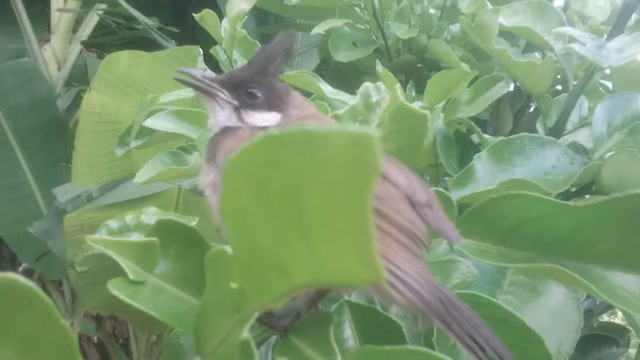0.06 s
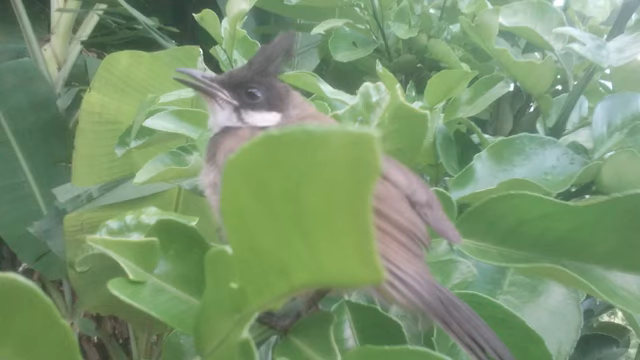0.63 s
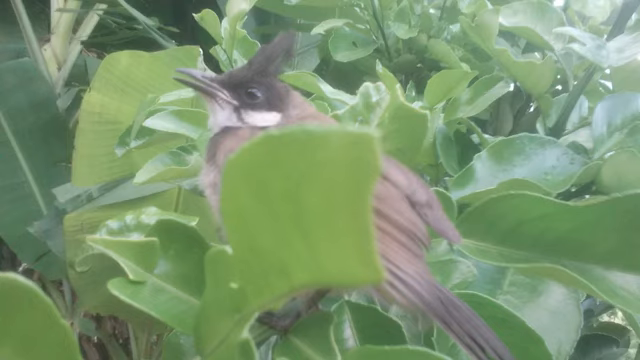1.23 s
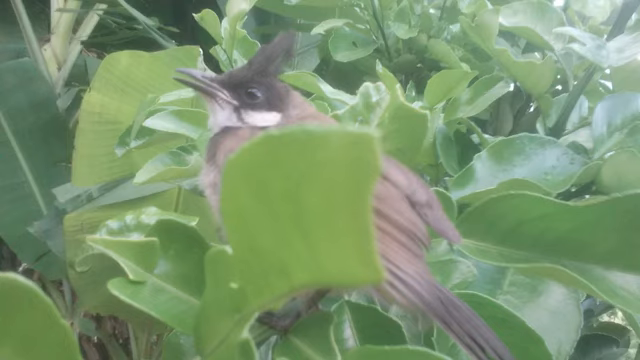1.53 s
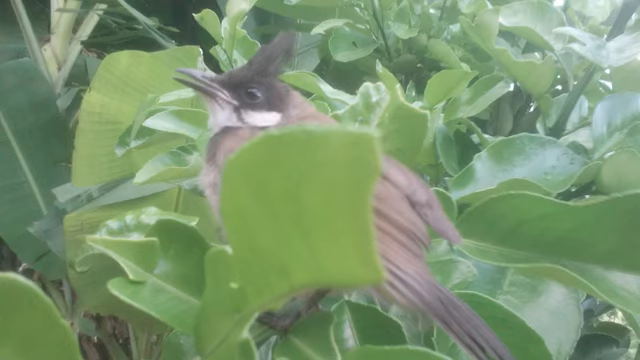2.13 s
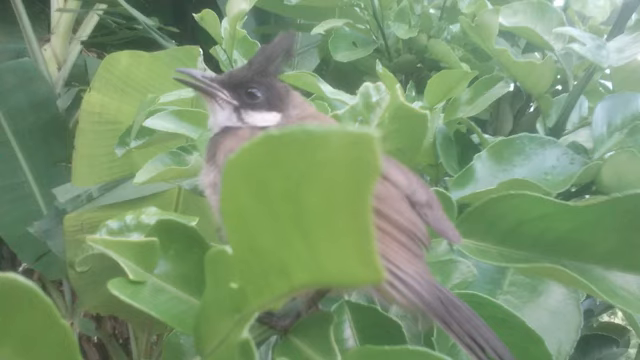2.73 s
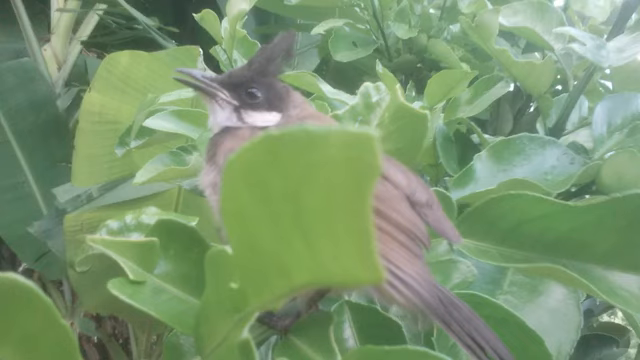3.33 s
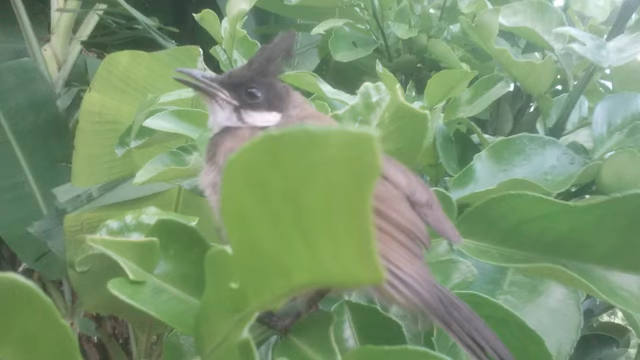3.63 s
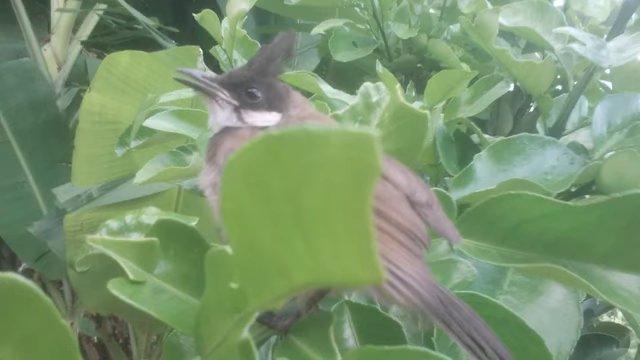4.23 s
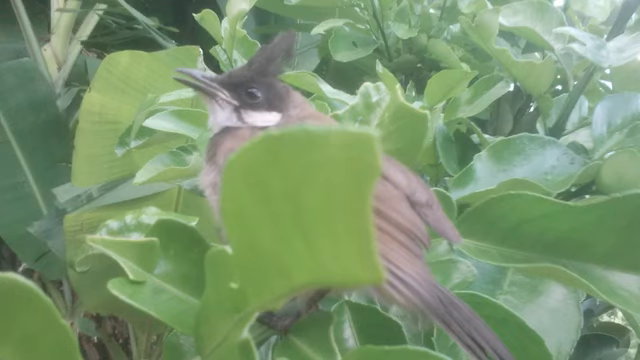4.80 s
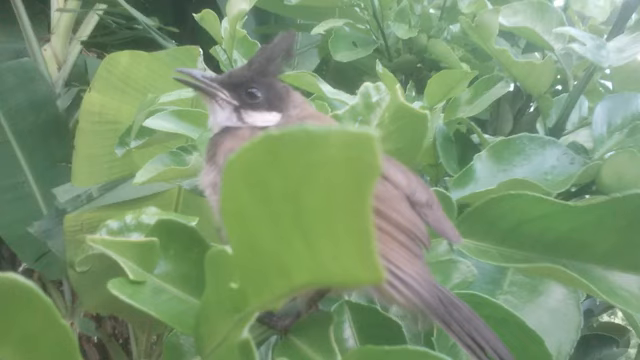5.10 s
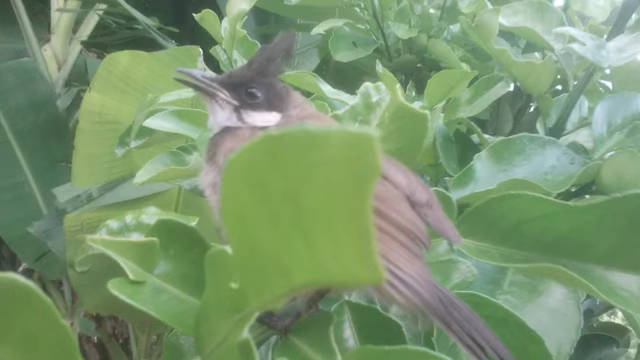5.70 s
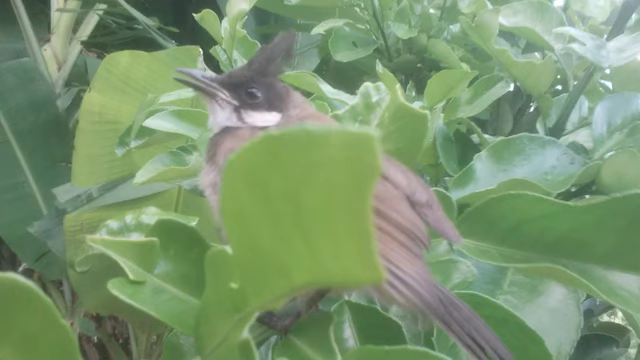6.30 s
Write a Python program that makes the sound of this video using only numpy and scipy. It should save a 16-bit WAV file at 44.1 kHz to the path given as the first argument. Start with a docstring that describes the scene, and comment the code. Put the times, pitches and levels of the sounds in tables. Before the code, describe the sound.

Sharp, slightly raspy bird chirps come singly and in pairs outdoors, while gusts of wind softly buffet the microphone.

```python
"""A bulbul gives fifteen sharp, rising chirps, singly and in pairs, from a bush near the microphone.
Each starts hoarse, climbs through a fast trill and leaps to a crest; windpipe and beak shape the
syrinx's harmonics and the leaves scatter them. Wind buffets the microphone unevenly. Far traffic
murmurs behind, with a few faint horns and an insect; there is one soft knock."""
import sys
import numpy as np
from scipy import signal
from scipy.fft import rfft, irfft, next_fast_len
from scipy.io import wavfile
from scipy.ndimage import uniform_filter1d, map_coordinates

SR = 44100
rng = np.random.default_rng(int(sys.argv[2]) if len(sys.argv) > 2 else 0)


def wav_record(signal):
    """Record a signal, one row per channel, as 16-bit PCM in the file named by sys.argv[1]."""
    frames = np.transpose(np.atleast_2d(signal))
    bounded = np.clip(frames, -1, 1)
    # unit amplitude maps onto the largest positive 16-bit level
    quanta = np.round(bounded * 32767).astype(np.int16)
    wavfile.write(sys.argv[1], SR, quanta)


N = 288855
TIME = np.arange(N) / SR
TOP_HZ = 15750


def undb(db):
    """Decibels to gain."""
    return 10 ** (np.asarray(db) / 20)


def curve(rows):
    """Linear envelope through (time_s, value) rows."""
    return np.interp(TIME, *np.transpose(rows))


def at_pitch(hz, points):
    """Interpolate (freq_hz, value) points on a log-frequency axis."""
    freq_hz, value = np.transpose(points)
    return np.interp(np.log(np.maximum(hz, 1)), np.log(freq_hz), value)


def colour(x, points):
    """Filter by (freq_hz, gain_db) points."""
    size = next_fast_len(len(x))
    gain = undb(at_pitch(np.fft.rfftfreq(size, 1 / SR), points))
    return irfft(rfft(x, size) * gain, size)[:len(x)]


def noise(points):
    """Unit-rms noise shaped by (freq_hz, gain_db) points."""
    x = colour(rng.standard_normal(N), points)
    return x / np.sqrt(np.mean(x ** 2))


def butter(order, hz, kind):
    """Butterworth sections."""
    return signal.butter(order, hz, kind, fs=SR, output="sos")


def wander(count, rate_hz):
    """Smooth random signal, spread near 1."""
    place = np.arange(count) * rate_hz / SR
    return map_coordinates(rng.standard_normal(count // 4), [place], order=3, mode="wrap")


def add(track, start_s, sound):
    """Mix a sound into a track."""
    i = max(int(start_s * SR), 0)
    track[i:i + len(sound)] += sound[:N - i]


# Road loudness: time_s, level_db
ROAD_LEVEL = [(0, -74.5), (2.4, -73), (4.4, -70), (5.4, -69), (6.55, -73)]
# Road spectrum: freq_hz, gain_db
ROAD_SPECTRUM = [(200, -10.5), (370, -8), (450, -4), (800, 1), (1200, -1.5), (1800, -6.5), (2500, -14.5),
                 (3500, -31), (6000, -36.5)]


def traffic():
    """Far road: a dull murmur in two bands that swell independently."""
    murmur = noise(ROAD_SPECTRUM)
    low = signal.sosfiltfilt(butter(2, 950, "low"), murmur)
    road = sum(band * undb(2.7 * wander(N, 24)) for band in (low, murmur - low))
    return road * undb(curve(ROAD_LEVEL))


# Horn blasts: start_s, length_s, pitch_hz, harmonic1_db, harmonic2_db, harmonic3_db
HORN_BLASTS = [(.48, .12, 512, -88, -72, -88), (.68, .16, 503, -87, -65, -66),
               (1.48, .45, 441, -75, -93, -93), (2.52, .56, 482, -78, -84, -90),
               (3.48, .55, 443, -78, -94, -94), (4.1, .5, 441, -81, -94, -94)]


def horns():
    """Far horns: three harmonics, wavering in pitch and level."""
    track = np.zeros(N)
    t = TIME[:SR]
    for start_s, length_s, pitch_hz, *levels_db in HORN_BLASTS:
        phase = 2 * np.pi * np.cumsum(pitch_hz * (1 + .009 * wander(SR, 70))) / SR
        swell = np.clip(np.minimum(t, length_s - t) / .011, 0, 1) * undb(1.9 * wander(SR, 31))
        tone = sum(np.sqrt(2) * undb(db) * np.sin(k * phase) for k, db in enumerate(levels_db, 1))
        add(track, start_s, swell * tone)
    return track


# Insect buzzes: start_s, length_s, level_db
INSECT_BUZZES = [(.24, .2, -82), (3.55, .7, -89)]


def insect():
    """Far insect: faint, flickering narrow-band noise."""
    buzz = noise([(3600, -40), (4350, -14), (4520, 0), (4700, -14), (5500, -40)])
    swell = sum(undb(db) * np.clip(np.minimum(TIME - start_s, start_s + length_s - TIME) / .09, 0, 1)
                for start_s, length_s, db in INSECT_BUZZES)
    return buzz * swell * undb(2 * wander(N, 30))


def knock(start_s=5.215, decay_s=.022):
    """One soft, dull knock, as of a finger shifting on the housing."""
    since_s = np.maximum(TIME - start_s, 0)
    body = noise([(100, 5.5), (300, -5), (800, -4.5), (2500, -18.5), (5000, -48.5)])
    return undb(-49.5) * body * (since_s > 0) * np.exp(-since_s / decay_s)


# Hardest eddies: start_s, strength_db
BUFFET_HITS = [(0.409, -33.5), (0.935, -36.5), (0.992, -31.5), (1.158, -36.5), (1.283, -28), (1.682, -41.5),
               (1.891, -37.5), (2.698, -34.5), (3.238, -32.5), (4.044, -36), (4.11, -31), (4.147, -42),
               (4.19, -31), (4.405, -30), (4.449, -36), (4.693, -34.5), (4.741, -27.5), (4.921, -34.5),
               (5.034, -37.5), (5.683, -43)]


def buffets(delay_s=.0095, width_s=.0018, wake_rise_s=.005, wake_decay_s=.014):
    """Eddies strike the microphone: returns their thuds and the envelope of the swirls they leave."""
    thuds, wakes = np.zeros(N), np.zeros(N)
    t = TIME[:SR // 10]
    push = (t - delay_s) / width_s
    pulse = (push ** 2 - 1) * np.exp(-push ** 2 / 2)
    wake = np.minimum(t / wake_rise_s, 1) * np.exp(-t / wake_decay_s)
    for start_s, strength_db in BUFFET_HITS:
        add(thuds, start_s, undb(strength_db - 3.5) * pulse)
        add(wakes, start_s, undb(strength_db - 7) * wake)
    return thuds, wakes


# Breeze between gusts: time_s, level_db
BREEZE_LEVEL = [(0, -63.5), (1.8, -65), (2.1, -85), (2.3, -63), (3.7, -66.5), (5.1, -59), (5.45, -78.5),
                (6.55, -84)]
# Gusts: start_s, length_s, strength_db
WIND_GUSTS = [(0.208, 0.35, -44.5), (0.73, 0.076, -53.5), (0.899, 0.17, -47.5), (1.138, 0.26, -43.5),
              (1.47, 0.038, -51.5), (1.638, 0.1, -45), (1.873, 0.017, -45), (2.261, 0.086, -65),
              (2.569, 0.36, -46), (2.991, 0.14, -48.5), (3.156, 0.19, -39.5), (3.421, 0.25, -48.5),
              (4.022, 1.08, -43), (5.207, 0.087, -49.5), (5.636, 0.1, -49.5)]


def airflow(rise_s=.021, fall_s=.025, gust_trim_db=-5.5):
    """Wind envelope: gusts rise, hold and die away over a light breeze."""
    flow = undb(curve(BREEZE_LEVEL))
    for start_s, length_s, strength_db in WIND_GUSTS:
        since_s = TIME - start_s
        release = np.exp(-np.maximum(since_s - length_s + fall_s, 0) / fall_s)
        flow += undb(strength_db + gust_trim_db) * np.clip(since_s / rise_s, 0, 1) * release
    return flow


# Eddy spectrum: freq_hz, gain_db
EDDY_SPECTRUM = [(18, -52.5), (30, -10.5), (40, -2), (52, 4), (70, 3.5), (95, -2), (130, -7.5), (170, -12),
                 (230, -31), (300, -23), (370, -47.5), (440, -33.5), (600, -53), (1000, -91.5)]


def wind(swirl_db=4, swirl_hz=50):
    """Eddies rumble on the microphone port, brighter in strong gusts; the hardest thud."""
    eddies = noise(EDDY_SPECTRUM)
    eddies /= np.sqrt(uniform_filter1d(eddies ** 2, size=1800))
    small_eddies = signal.sosfilt(butter(2, 170, "high"), noise(EDDY_SPECTRUM))
    thuds, wakes = buffets()
    flow_db = 20 * np.log10(airflow() + wakes)
    brightness = np.clip((flow_db + 55) / 14, 0, .9)
    rumble = (eddies + brightness * small_eddies) * undb(flow_db + swirl_db * wander(N, swirl_hz))
    return signal.sosfiltfilt(butter(4, 36, "high"), rumble + thuds)


def scatter(song):
    """Echoes: quick scatter off the nearest leaves, a faint tail from the garden."""
    t = TIME[:SR // 2]
    response = 0
    for t60_s, echo_db in [(.02, -18), (.4, -38)]:
        tail = rng.standard_normal(len(t)) * undb(-60 * t / t60_s) * (t > .001)
        response = response + undb(echo_db) * tail / np.linalg.norm(tail)
    return signal.fftconvolve(song, response)[:N]


# Crest contour, leap to end: time_fraction, pitch_ratio
CREST_ARCH = [(0, .9), (.2, .97), (.4, 1), (.6, .98), (.8, .87), (1, .76)]


def syrinx_pitch(t, leap_s, length_s, open_hz, climb_hz, crest_hz, trill):
    """A scoop, a quickening trilled climb, then a leap to an arched crest that cracks once and falls."""
    scoop = 1 - .13 * np.exp(-((t - .009) / .0044) ** 2)
    rising_hz = open_hz * scoop + (climb_hz - open_hz) * np.clip(t / leap_s, 0, 1) ** 2
    crest_fraction = np.clip((t - leap_s) / (length_s - leap_s), 0, 1)
    arch_hz = crest_hz * np.interp(crest_fraction, *np.transpose(CREST_ARCH))
    crack = 1 - .2 * np.exp(-((crest_fraction - .6) / .07) ** 2)
    leapt = np.clip((t - leap_s) / .002, 0, 1)
    return (1 - leapt) * rising_hz * (1 + trill) + leapt * arch_hz * crack


# Harmonics, throat tuned to the second: number, gain_db
THROAT_HARMONICS = [(1, -12), (2, -2), (3, -20), (4, -19), (5, -31.5), (6, -24), (7, -33), (8, -27.5),
                    (9, -39), (10, -36.5), (11, -50), (12, -38)]
# Windpipe and beak response: freq_hz, gain_db
TRACT_RESPONSE = [(600, -30), (1000, -13.5), (1400, -9), (1900, 3), (3000, 3), (4100, -2), (4800, -8),
                  (6200, 0), (7500, -8.5), (10000, -8), (12500, -19.5), (15500, -13)]
# Treble let out by the open beak: freq_hz, gape_share
BEAK_TREBLE = [(2200, 0.007), (4500, 0.51), (6300, 1), (9000, 0.5), (12000, 0.19)]


def vocal_tract(pitch_hz, gape_db, odd_db):
    """Harmonic voice and breath hiss, each shaped by the windpipe and the opening beak."""
    phase = 2 * np.pi * np.cumsum(pitch_hz) / SR
    voice = 0
    for k, harmonic_db in THROAT_HARMONICS:
        hz = k * pitch_hz
        tract_db = at_pitch(hz, TRACT_RESPONSE) + gape_db * at_pitch(hz, BEAK_TREBLE)
        gain = undb(harmonic_db + k % 2 * odd_db + tract_db) * (hz < TOP_HZ)
        voice = voice + np.sqrt(2) * gain * np.sin(k * phase)
    breath = colour(rng.standard_normal(len(pitch_hz)), TRACT_RESPONSE)
    treble = signal.sosfiltfilt(butter(2, [5200, 9500], "band"), breath)
    return voice, breath + treble * (undb(gape_db) - 1)


def chirp(leap_s, length_s, open_hz, climb_hz, crest_hz, trill_depth, trill_hz,
          base_db, crest_db, climb_gape_db, crest_gape_db):
    """One call: the syrinx membranes trill, rasp and flutter as the beak opens and shuts."""
    count = SR // 6
    t = TIME[:count]
    depth = trill_depth * np.clip((t / leap_s - .25) / .6, 0, 1) ** 1.3
    trill_phase = 2 * np.pi * trill_hz * (t - leap_s) + wander(count, 90)
    trill = depth * np.sin(trill_phase)
    throb = undb(11 * depth * np.sin(trill_phase + .8))
    pitch_hz = syrinx_pitch(t, leap_s, length_s, open_hz, climb_hz, crest_hz, trill)

    # A higher crest and a wider beak add rasp.
    rasp = undb(2.44 + .0199 * (crest_hz - 2120) + .17 * climb_gape_db)
    hoarse = rasp * np.interp(t, [.4 * leap_s, .85 * leap_s], [.45 * rasp, 1.2])
    # The membranes flutter at onset and burr when a high crest strains them.
    onset = np.interp(t, [.010, .018], [1, 0])
    strain = np.clip((crest_hz - 1650) / 400, 0, 1) * np.interp(t, [leap_s, leap_s + .012], [0, 1])
    jitter = .019 * hoarse * wander(count, 1200) + .042 * strain * wander(count, 450)
    jitter += .11 * onset * wander(count, 700)

    gape_db = np.interp(t, [0, .019, .5 * leap_s, leap_s + .02, length_s - .016, length_s],
                        [climb_gape_db - 16.5, climb_gape_db, climb_gape_db,
                         crest_gape_db, crest_gape_db, crest_gape_db - 16.5])
    odd_db = -3.5 * np.clip(2 - 2 * t / leap_s, 0, 1)  # odd harmonics break out at the crest
    voice, breath = vocal_tract(pitch_hz * (1 + jitter), gape_db, odd_db)
    voice *= 1 + .13 * hoarse * wander(count, 1300) + .42 * (strain + onset) * wander(count, 550)
    breath *= undb(-24) * rasp * np.interp(t, [.002, .02, leap_s], [0, .65, 1])

    effort_db = np.interp(t, [0, .008, .02, .5 * leap_s, leap_s,
                              length_s - .018, length_s - .008, length_s],
                          [-15, -11, -1, 0, crest_db / 2 - .5,
                           crest_db - 1, crest_db - 13.5, crest_db - 27])
    gate = np.sin(np.pi / 2 * np.clip(np.minimum(t, length_s - t) / .004, 0, 1)) ** 2
    return (voice + breath) * throb * gate * undb(base_db + effort_db)


# Calls: start_s, leap_s (after start), length_s, open_hz, climb_hz (before the leap), crest_hz,
# trill_depth_ratio, trill_hz, base_db, crest_db (relative to base), climb_gape_db, crest_gape_db
BULBUL_CALLS = [ (.158, 0.082, .110, 915, 1570, 1948, 0.13, 139.3, -34, -1, 8, 12.5),
                (0.657, 0.071, 0.11, 931, 1394, 2017, 0.11, 152, -31.5, 5.5, 4, -3.5),
                (0.801, 0.064, 0.1, 989, 1340, 1782, 0.083, 167, -27.5, 0, 5.5, -0.5),
                (1.474, 0.083, .110, 911, 1664, 1990, 0.17, 145, -30, 5.5, 3, -1.5),
                (1.606, 0.056, 0.096, 1000, 1263, 1544, 0.13, 145.5, -24, -3, -3, -4.5),
                (2.037, 0.078, 0.12, 905, 1377, 2090, 0.14, 138, -33, 0, 0, 8.5),
                (2.748, 0.075, 0.12, 898, 1440, 1993, .13, 156, -32, -2, -6, -8),
                (2.891, 0.067, 0.1, 952, 1368, 1690, 0.12, 169.7, -29, -4.5, -3.5, -1),
                (3.696, 0.07, 0.11, 939, 1480, 2040, 0.15, 145.4, -30.5, -2.5, -5.5, -1),
                (3.823, 0.066, 0.093, 1187, 1319, 1882, .15, 137, -28.5, 0, 0, -6),
                (4.567, .073, .110, 931, 1461, 1985, 0.16, 136, -27.5, -1, -4.5, 1),
                (5.049, 0.072, 0.11, 880, 1547, 1955, 0.12, 181.6, -29.5, -0.5, 0.5, 11),
                (5.245, .086, 0.12, 842, 1604, 2065, 0.12, 150, -34, 3, 26, 8),
                (5.728, .083, 0.12, 904, 1551, 2016, 0.097, 133, -35.5, -.5, 20.5, 8),
                (6.239, 0.073, .120, 875, 1435, 2000, 0.1, 157.6, -36, .5, 13, 10), ]


def bulbul():
    """The bird in its bush: direct chirps plus their echoes."""
    song = np.zeros(N)
    for start_s, *call in BULBUL_CALLS:
        add(song, start_s, chirp(*call))
    return song + scatter(song)


def scene():
    """All sources at one microphone."""
    return (bulbul() + wind() + traffic() + horns() + insect() + knock())[None]


def record(dry, hold_s=.027, reference_db=-45):
    """A noise suppressor passes microphone hiss after loud treble and closes slowly; the top is cut."""
    treble = signal.sosfilt(butter(4, 4500, "high"), dry[0])
    pole = np.exp(-1 / (hold_s * SR))
    held_power = signal.lfilter([1 - pole], [1, -pole], treble ** 2) + 1e-18
    opening = (held_power / undb(reference_db) ** 2) ** .45
    hiss = noise([(300, -3), (4000, 0), (9000, -1.5), (12000, -4), (15500, -5)])
    sound = dry + hiss * (undb(-85) + undb(-68.5) * opening)
    return signal.sosfilt(signal.ellip(10, .2, 70, TOP_HZ, fs=SR, output="sos"), sound)


dry = scene()
out = record(dry)
wav_record(out)
```